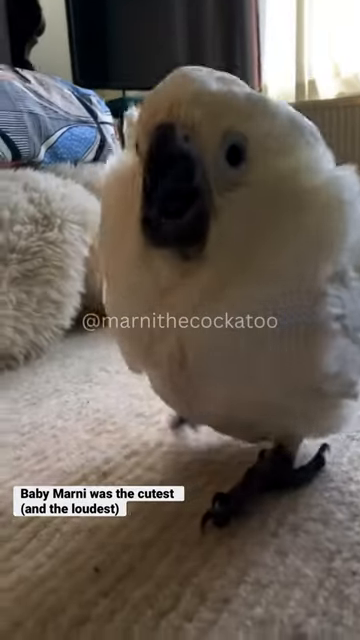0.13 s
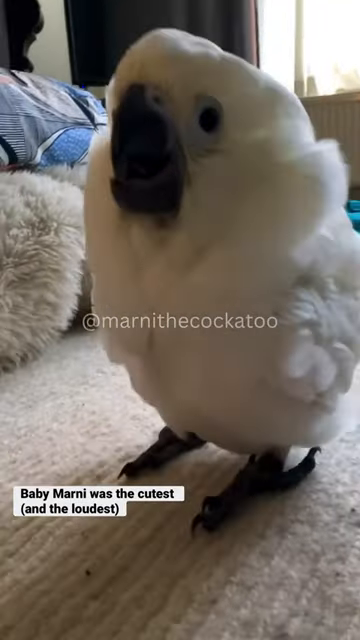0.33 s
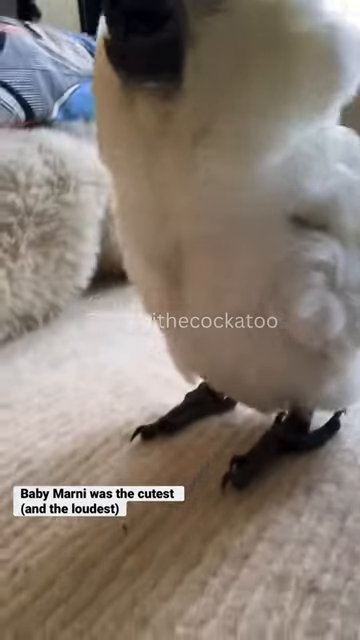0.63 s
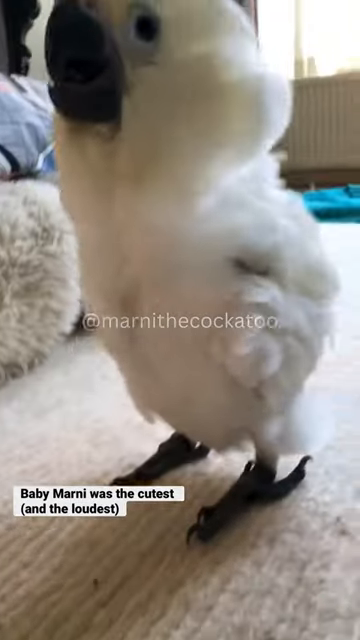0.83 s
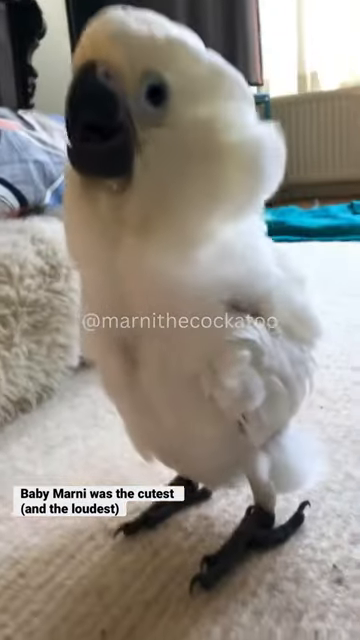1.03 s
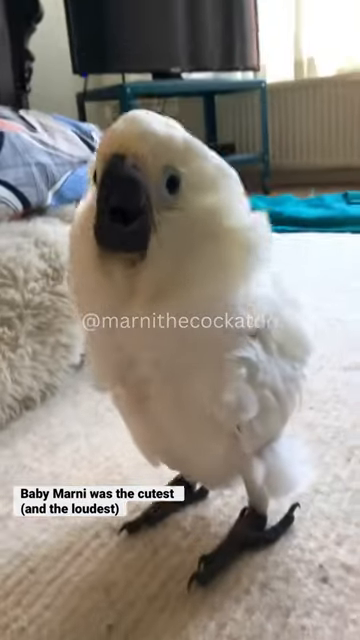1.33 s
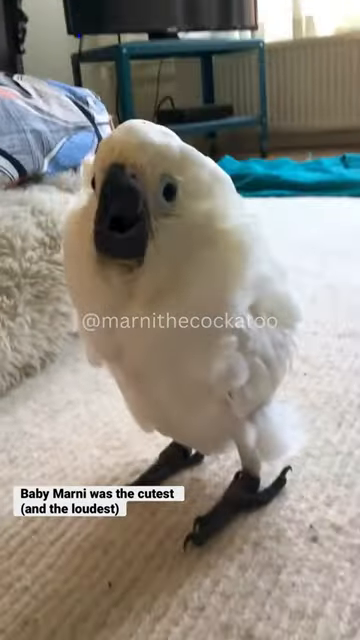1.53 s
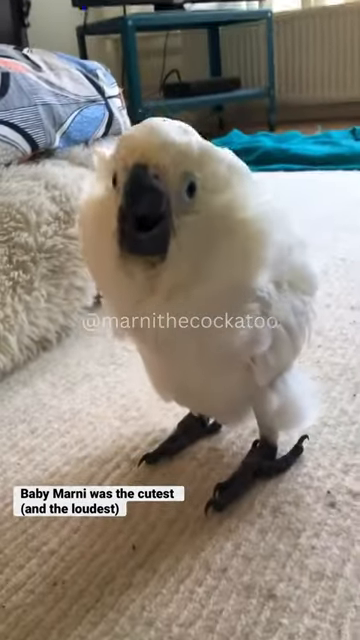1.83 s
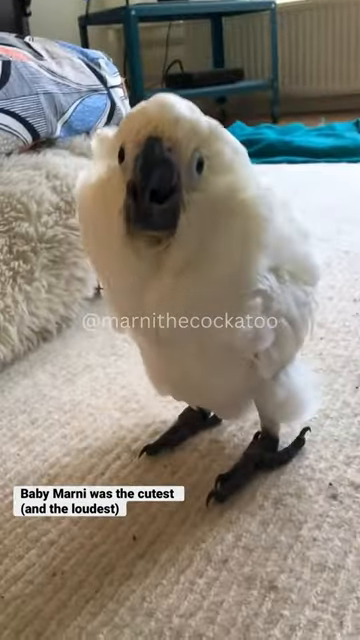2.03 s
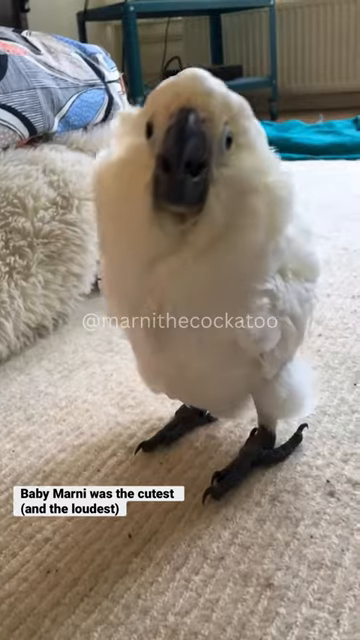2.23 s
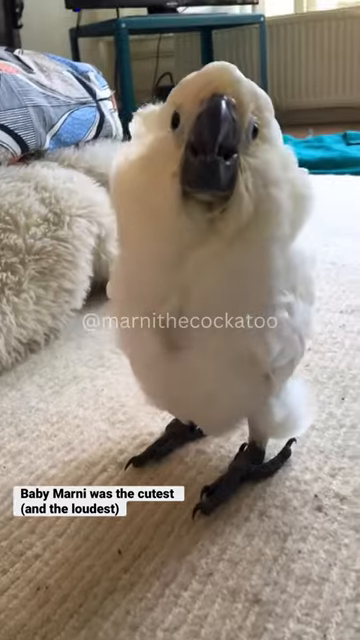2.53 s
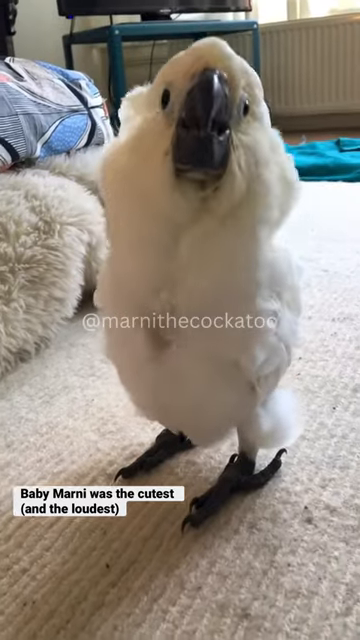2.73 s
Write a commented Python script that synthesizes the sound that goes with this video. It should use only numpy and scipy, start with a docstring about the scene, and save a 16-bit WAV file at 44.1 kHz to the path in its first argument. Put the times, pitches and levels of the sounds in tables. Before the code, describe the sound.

Two raspy begging calls from a young cockatoo, after soft shuffling and thumps.

```python
"""Young cockatoo begging

A young cockatoo on a living-room carpet gives two long, rasping calls close by. Its voice is a run of
snaps that ring its throat and beak. They come mostly three or four throat vibrations apart, hopping
irregularly between the two: that is the rasp. Before calling, the bird shuffles and clicks its beak;
soft thumps and a low drone fill the room."""
import sys
import numpy as np
from scipy import signal
from scipy.fft import rfft, irfft, next_fast_len
from scipy.io import wavfile
from scipy.ndimage import map_coordinates

SR = 44100
rng = np.random.default_rng(int(sys.argv[2]) if len(sys.argv) > 2 else 0)


def materialize(psi):
    """Save the field psi as 16-bit PCM at rate SR to the path in sys.argv[1].

    A 1-D psi becomes a single channel; in a 2-D psi each row is a channel.
    """
    bounded = np.clip(np.atleast_2d(psi).T, -1, 1)
    quanta = np.round(bounded * 32767).astype(np.int16)
    wavfile.write(sys.argv[1], SR, quanta)


N = 126567


def begging_calls():
    """Two calls, each a run of snaps; a snap that comes after a longer wait hits harder."""
    # Per call: t/s, throat resonance/Hz, beak resonance/Hz, mean throat cycles per snap, disorder (0-1)
    throats = [
        [(1.327, 1460, 5250, 2.93, .15), (1.355, 1446, 4900, 3.16, .1), (1.375, 1591, 4800, 3.19, .3),
         (1.40, 1662, 5140, 3.66, .4), (1.43, 1611, 5080, 3.27, .4), (1.53, 1725, 5360, 3.1, .35),
         (1.63, 1787, 5600, 3.21, .35), (1.78, 1818, 5850, 3.32, .45), (1.95, 1791, 5802, 3.21, .45),
         (1.992, 1755, 5760, 4.6, .8), (2.005, 1185, 5810, 2.1, .7)],
        [(2.352, 1658, 5600, 4.86, .9), (2.41, 1666, 5600, 3.68, .8), (2.465, 1678, 5700, 3.76, .6),
         (2.48, 1693, 5700, 3.98, .08), (2.51, 1664, 5640, 3.5, .1), (2.55, 1682, 5580, 3.5, .5),
         (2.64, 1600, 5420, 3.37, .7), (2.69, 1627, 5480, 3.5, .1), (2.74, 1548, 5230, 3.65, .12),
         (2.765, 1641, 5070, 4, .06), (2.80, 1529, 5120, 4, .06), (2.84, 1360, 5014, 4, .3)],
    ]
    # How hard each call is pushed: t/s, level/dB, brightness/(dB per octave)
    efforts = [
        [(1.327, -44.5, -6.5), (1.336, -36.5, -3), (1.368, -31, 2), (1.40, -34, -0.5), (1.63, -35, 0.5),
         (1.79, -38, 1), (1.95, -39.5, 0.5), (1.99, -51.5, 0.5), (2.011, -51.5, -5), (2.018, -58, -24)],
        [(2.352, -44, -12.5), (2.365, -37.5, -2), (2.394, -37, -1.5), (2.452, -38.5, -.5), (2.6, -39.5, -1),
         (2.766, -41.5, 0), (2.804, -45, 0.5), (2.84, -58, -7)],
    ]
    # Tone of the voice: f/Hz, gain/dB
    voice_colour = [(150, -0.5), (400, -1), (1000, 0), (4000, 1.5), (4700, -2.5), (8000, 2), (9000, -14.5),
                    (14000, 6.5)]
    # Timing scatter of even the steadiest snaps, per call: t/s
    jitter_s = [.00003, .00007]
    wait_db_per_cycle, scatter_db = 1, .12
    voice = np.zeros(N)
    for call, (throat, effort) in enumerate(zip(throats, efforts)):
        times = snap_times(throat, effort[0][0], effort[-1][0], jitter_s[call])
        throat_hz, beak_hz, cycles, disorder = at(throat, times)
        level_db, brightness = at(effort, times)
        extra_cycles = np.r_[0, np.diff(times) * throat_hz[1:] - cycles[1:]]
        hard_db = wait_db_per_cycle * extra_cycles + scatter_db * rng.standard_normal(len(times))
        starts = np.ceil(times * SR).astype(int) - 64  # leave room for the rise
        t = (starts[:, None] + np.arange(480)) / SR - times[:, None]  # one row per snap
        rings = resonances(t, throat_hz, beak_hz, brightness + .44 * hard_db, call)  # harder is brighter
        rings = beak_notches(air_puffs(rings, disorder), beak_hz)
        rings /= np.linalg.norm(rings, axis=1, keepdims=True)
        strength = amp(level_db + hard_db) * np.sqrt(SR * cycles / throat_hz)
        for start, ring in zip(starts, rings * strength[:, None]):
            add(voice, start, ring)
    return filtered(voice, lambda hz: amp(along(voice_colour, hz)))


def snap_times(throat, start, end, jitter_s, slip_s=.00021):
    """Each snap waits a whole number of throat cycles, at least three; disorder makes it hop and slip."""
    times, owed = [start], 0
    for hop, slip in rng.standard_normal((600, 2)):
        hz, _, cycles, disorder = at(throat, times[-1])
        whole = max(np.round(cycles + owed + disorder * hop), 3)
        owed = np.clip(owed + cycles - whole, -1, 1) * (1 - disorder)  # carried to the next wait
        times.append(times[-1] + whole / hz + (jitter_s + slip_s * disorder) * slip)
    times = np.array(times)
    return times[times < end]


def resonances(t, throat_hz, beak_hz, brightness, call, scatter_db=2.3, rise_s=.00005):
    """A snap sets the throat and beak ringing at several pitches that quickly die away."""
    # Resonances at rest: f/Hz, width/Hz, how far each follows the throat, how far the beak,
    # relative level/dB in the first call, relative level/dB in the second
    formants = [(514, 470, 0.031, 2.1, -8.5, -10.5), (1372, 303, 1.12, 0.31, -0.5, -0.5),
                (1743, 176, 0.59, 0.058, -1.5, -3), (2336, 610, 0.078, 0, -5, -6),
                (3100, 274, .1, 0, -7, -10), (3710, 410, 0.047, 0.57, -4, -4.5),
                (4250, 420, 1.6, .9, -7, -16.5), (5730, 640, 0.036, 0.44, -3, -6),
                (8130, 233, 0, 1.29, -25, -26.5), (9200, 700, 0.25, 0.36, -20.5, -47),
                (13900, 1200, 0.097, 1, -30.5, -30), (15600, 320, 0.19, 0.59, -42, -38)]
    # Main resonances at rest: throat f/Hz, beak f/Hz
    rest_hz = [1780, 5900]
    # Extra damping of the throat resonances, per call: width/Hz
    blur_hz = [40, 165]
    rings = 0
    for hz, width, with_throat, with_beak, *levels_db in formants:
        moved_hz = hz * (throat_hz / rest_hz[0]) ** with_throat * (beak_hz / rest_hz[1]) ** with_beak
        db = levels_db[call] + brightness * np.log2(hz / rest_hz[0])
        gain = amp(db + scatter_db * rng.standard_normal(len(t)))
        fade = np.exp(-np.pi * (width + blur_hz[call] * with_throat) * t)
        rings = rings + gain[:, None] * fade * np.cos(2 * np.pi * moved_hz[:, None] * t)
    return rings / (1 + np.exp(-t / rise_s))


def air_puffs(rings, disorder, air_db=-6):
    """Swirling air adds a puff of noise to each snap, stronger with more disorder."""
    count, size = rings.shape
    puffs = rng.standard_normal((count, size // 4)) / np.sqrt(size // 4)
    breath = signal.fftconvolve(rings, puffs, axes=1)[:, :size]
    return rings + amp(air_db) * np.sqrt(disorder[:, None]) * breath


def beak_notches(rings, beak_hz):
    """The beak weakens three narrow bands of each snap."""
    # Weakened bands: multiple of the beak resonance, width/Hz, gain/dB
    notches = [(.79, 320, -4.5), (1.171, 330, -10.5), (1.48, 348, -11)]
    size = rings.shape[1]
    hz = np.fft.rfftfreq(2 * size, 1 / SR)
    cut_db = sum(db * np.exp(-((hz - ratio * beak_hz[:, None]) / width) ** 2)
                 for ratio, width, db in notches)
    return irfft(rfft(rings, 2 * size) * amp(cut_db))[:, :size]


def beak_clicks():
    """The beak clicks twice, with a tiny, high ring."""
    # Clicks: t/s, peak level/dB, f/Hz
    clicks = [(.721, -58.5, 2400), (1.194, -47.5, 1870)]
    return knocks(clicks, ring_s=.01, rise_s=.0015, second_ratio=.72, second_db=-8)


def thumps():
    """Soft blows ring low and briefly."""
    # Thumps: t/s, peak level/dB, f/Hz
    blows = [(.246, -33.5, 142), (.405, -48.5, 326), (.972, -24.5, 92.8), (1.019, -32.5, 103),
             (2.834, -31.5, 95)]
    return knocks(blows, ring_s=.071, rise_s=.005, second_ratio=1.4, second_db=-9.5)


def shuffling():
    """The moving bird rustles unevenly, and its feathers swish once."""
    # Loudness of the rustle and the swish: t/s, level/dB
    rustle = [(0, -62.5), (.22, -62.5), (.4, -70), (.6, -69), (.75, -78.5), (1.2, -76), (1.6, -110)]
    feathers = [(.72, -93), (.86, -69), (1.0, -72.5), (1.1, -110)]
    # Their tone: f/Hz, relative level/dB
    rustle_colour = [(240, -21), (400, -1), (803, -8), (875, -4), (1610, -5), (5980, -20), (12000, -33),
                     (15600, -34), (22000, -120)]
    feather_colour = [(1000, -42.5), (4500, -22), (7000, -19.5), (8600, -15), (10500, -32.5),
                      (13000, -18.5), (15000, -29.5)]
    flicker = amp(1.9 * wobble(39))
    return swell(rustle) * flicker * noise(rustle_colour) + swell(feathers) * noise(feather_colour)


def drone(pitch_hz=94.36):
    """A low, wavering hum over a rumble; a tone one octave up joins in later."""
    # Loudness of the bass and of the octave: t/s, level/dB
    bass = [(0, -44), (.55, -44.5), (.65, -42), (.75, -48.5), (.88, -45), (1.15, -48.5), (1.36, -43.5),
            (1.6, -46.5), (2.0, -46), (2.2, -44.5), (2.45, -47.5), (2.66, -40), (2.78, -48), (2.87, -36.5)]
    octave = [(1.7, -80), (1.95, -52), (2.3, -55.5), (2.6, -49.5), (2.87, -54.5)]
    # Tone of the rumble: f/Hz, relative level/dB
    rumble = [(15, -78), (25, -34.5), (53, 1), (102, -3), (114, 1), (125, -7), (189, -13), (216, -14.5),
              (334, -19), (600, -81.5), (780, -47), (1320, -120)]
    phase = 2 * np.pi * np.cumsum(pitch_hz + 3 * wobble(14)) / SR
    hum = amp(-3) * unit(np.sin(phase) * amp(wobble(11)))
    return swell(bass) * (hum + amp(-1.5) * noise(rumble)) + swell(octave) * np.sin(2 * phase)


def room_hiss():
    """Faint noise fills the room."""
    # Loudness of the hiss: t/s, level/dB
    hiss = [(1.1, -68.5), (2.2, -71.5)]
    # Its tone: f/Hz, relative level/dB
    hiss_colour = [(240, -31), (400, 0), (577, -8), (705, -5.5), (914, -12.5), (1030, -10.5), (1510, -12.5),
                   (8930, -20), (15500, -29.5)]
    return swell(hiss) * noise(hiss_colour)


def room_echo(x):
    """A carpeted room answers with a short echo whose low notes die first."""
    fade_times = [(200, .083), (2000, .34), (10000, .39)]  # f/Hz, time to fade by 60 dB/s
    hz, t, spectrum = signal.stft(rng.standard_normal(SR // 2), SR, nperseg=256)
    fade = amp(-60 * t / along(fade_times, hz)[:, None])
    tail = signal.istft(spectrum * fade, SR, nperseg=256)[1]
    delayed = np.pad(tail / np.linalg.norm(tail), (SR // 400, 0))
    return signal.fftconvolve(x, delayed)[:N]


def knocks(rows, ring_s, rise_s, second_ratio, second_db):
    """Each blow rings two tones that fade by 60 dB in ring_s."""
    out, t = np.zeros(N), np.arange(SR // 4) / SR
    for s, db, hz in rows:
        ring = np.sin(2 * np.pi * hz * t) + amp(second_db) * np.sin(2 * np.pi * hz * second_ratio * t)
        ring *= amp(-60 * t / ring_s) * (1 - np.exp(-t / rise_s))
        add(out, round(s * SR), amp(db) * ring / np.abs(ring).max())
    return out


def amp(db):
    """Turn decibels into a gain."""
    return 10 ** (np.asarray(db) / 20)


def unit(x):
    """Scale to an average power of 1."""
    return x / np.sqrt(np.mean(x ** 2) + 1e-20)


def along(points, hz):
    """Read (f/Hz, value) points at hz, on a log frequency axis."""
    f, values = np.transpose(points)
    return np.interp(np.log(hz + 1), np.log(f + 1), values)


def at(rows, t):
    """Read a table's columns at time t."""
    times, *columns = np.transpose(rows)
    return [np.interp(t, times, column) for column in columns]


def swell(rows):
    """A gain for every sample, from (t/s, level/dB) points."""
    return amp(at(rows, np.arange(N) / SR)[0])


def wobble(rate):
    """A smooth curve through `rate` random values a second."""
    return map_coordinates(rng.standard_normal(int(N * rate / SR) + 4), [np.arange(N) * rate / SR])


def filtered(x, response):
    """Scale each frequency of x by response(hz)."""
    size = next_fast_len(N + SR // 2)
    return irfft(rfft(x, size) * response(np.fft.rfftfreq(size, 1 / SR)), size)[:N]


def noise(colour):
    """Noise of power 1 with the given tone."""
    return unit(filtered(rng.standard_normal(N), lambda hz: amp(along(colour, hz))))


def add(track, start, sound):
    """Mix a sound in, from sample `start` on."""
    part = track[start:start + len(sound)]
    part += sound[:len(part)]


def scene():
    """The bird and its echo, over the quieter sounds of the room."""
    bird = begging_calls() + beak_clicks()
    return (bird + amp(-13) * room_echo(bird) + thumps() + shuffling() + drone() + room_hiss())[None]


def record(dry, top_hz=15800):
    """Cut off the highest treble."""
    return filtered(dry[0], lambda hz: hz < top_hz)[None]


dry = scene()
out = record(dry)
materialize(out)
```